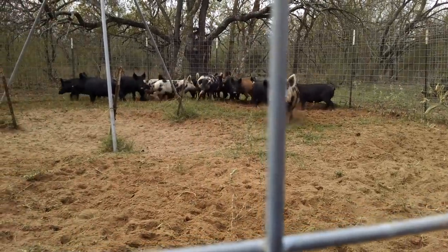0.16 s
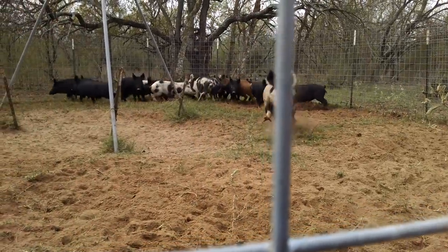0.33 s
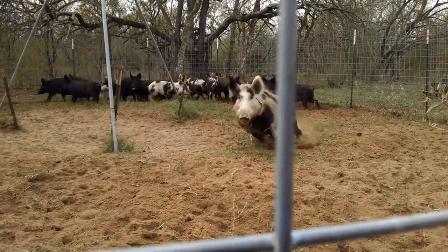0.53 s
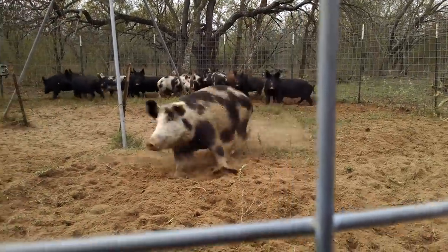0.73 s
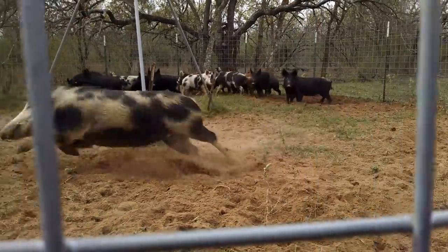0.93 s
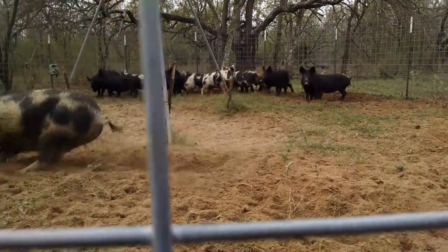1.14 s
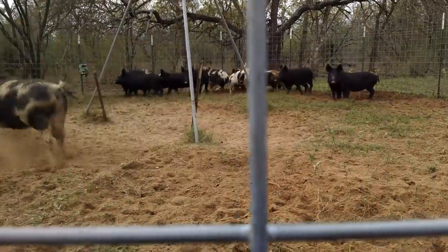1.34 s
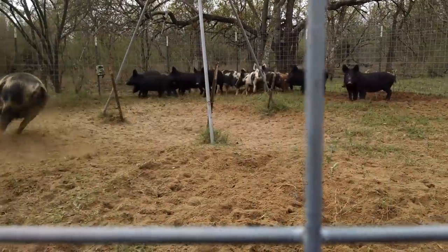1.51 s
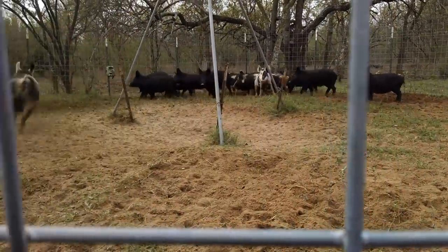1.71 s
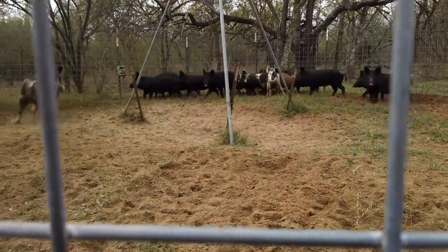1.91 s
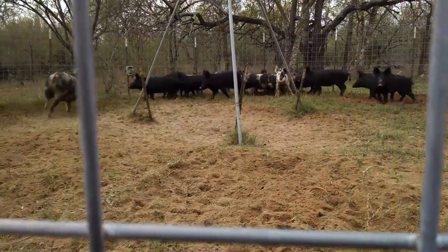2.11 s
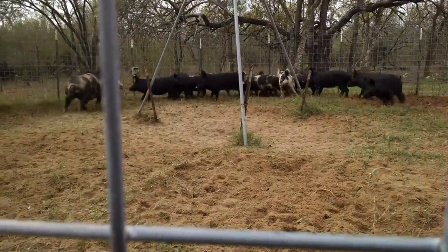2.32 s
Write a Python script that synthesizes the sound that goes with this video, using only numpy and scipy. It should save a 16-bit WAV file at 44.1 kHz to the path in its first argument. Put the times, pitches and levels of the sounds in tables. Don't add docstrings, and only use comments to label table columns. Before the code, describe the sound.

Rough hog grunts burst out close by, ending in a hard ringing bark and light hoof knocks

```python
import sys
import numpy as np
from scipy import signal
from scipy.fft import rfft, irfft, next_fast_len
from scipy.io import wavfile
from scipy.ndimage import uniform_filter1d

SR = 44100
rng = np.random.default_rng(int(sys.argv[2]) if len(sys.argv) > 2 else 0)


def generate_wav(signal):
    frames = np.transpose(np.atleast_2d(signal))
    scaled = np.clip(frames, -1, 1) * 32767
    pcm = np.round(scaled).astype(np.int16)
    wavfile.write(sys.argv[1], SR, pcm)


def convert_level_to_amplitude(level_db):
    exponent = np.asarray(level_db, float) / 20
    return 10 ** exponent


N = 103635
T = np.arange(N) / SR


def curve(rows, col=1, **ends):
    rows = np.array(rows, float)
    return np.interp(T, rows[:, 0], rows[:, col], **ends)


def unit(x):
    return x / np.sqrt(np.mean(x ** 2) + 1e-30)


LAG_S, KNEE_HZ, KNEE_WIDTH_HZ = .0004, 1440, 120
STAIR = .42


def colour(x, points, turn=0):
    size = next_fast_len(N + 4096)
    f = np.arange(size // 2 + 1) * SR / size + 1e-3
    hz, db = np.array(points, float).T
    gain = convert_level_to_amplitude(np.interp(np.log(f), np.log(hz), db))
    hz_above_knee = KNEE_WIDTH_HZ * np.logaddexp(0, (f - KNEE_HZ) / KNEE_WIDTH_HZ)
    phase = 2 * np.pi * turn * LAG_S * hz_above_knee
    phase = phase - STAIR * np.sin(2 * phase)
    return irfft(rfft(x, size) * gain * np.exp(-1j * phase), size)[..., :N]


def ring(x, hz, width_hz):
    return signal.lfilter(*signal.iirpeak(hz, hz / width_hz, fs=SR), x)


def tract(x, peaks):
    return sum((-1) ** k * convert_level_to_amplitude(db) * ring(x, hz, width) for k, (hz, width, db) in enumerate(peaks))


def walk(rate_hz):
    hold = int(SR / rate_hz)
    steps = np.repeat(rng.standard_normal(N // hold + 1), hold)
    return 1.3 * uniform_filter1d(uniform_filter1d(steps, hold), hold)[:N]


# pitch_hz [Hz], level_db [dB per Hz]
AIR_COLOUR = [(25, -5), (90, 0), (300, -9.5), (700, -13), (2000, -20), (3400, -18.5), (6000, -23),
              (15500, -71)]
AIR_DB, THUD_DB = -52.5, 4.5


def air():
    noise = unit(colour(rng.standard_normal(N), AIR_COLOUR))
    bass = signal.sosfilt(signal.butter(2, 350, fs=SR, output="sos"), noise)
    return convert_level_to_amplitude(AIR_DB) * (bass * convert_level_to_amplitude(THUD_DB * walk(25.18)) + (noise - bass) * convert_level_to_amplitude(0.93 * walk(11.76)))


# start_s [s], level_db [dB]
SHUFFLE_LEVEL = [(0, -59.5), (.4, -58.5), (.92, -61), (1.1, -58.5), (1.3, -58), (1.5, -49.5), (1.9, -53.5),
                 (2.35, -60)]
# pitch_hz [Hz], level_db [dB per Hz]
LEAF_COLOUR = [(2500, -33), (4000, -8), (7000, 1), (10500, 5), (15500, -4.5)]


def shuffle():
    grain = convert_level_to_amplitude(walk(60.7) + 1.8 * walk(900))
    rustle = unit(colour(rng.standard_normal(N) * grain, [(1200, -55), *LEAF_COLOUR]))
    return rustle * convert_level_to_amplitude(curve(SHUFFLE_LEVEL) + 1)


# start_s [s], length_s [s], level_db [dB], pitch_hz (centre) [Hz]
FOOT_SCUFFS = [(0.08, 0.3, -51.5, 68.4), (0.239, 0.023, -37.5, 60), (0.617, 0.043, -32, 91),
               (0.804, 0.087, -31, 306), (0.832, 0.072, -30, 88), (1.144, 0.094, -44.5, 700),
               (1.238, 0.068, -49, 950), (1.817, 0.091, -52, 437), (2.205, 0.19, -56, 1320),
               (2.23, 0.12, -48, 80)]


def scuffs():
    out = 0
    for start_s, length_s, level_db, pitch_hz in FOOT_SCUFFS:
        u = np.clip((T - start_s) / length_s, 0, 1)
        rasp = unit(ring(rng.standard_normal(N), pitch_hz, 1.2 * pitch_hz)) * convert_level_to_amplitude(2.5 * walk(90))
        out = out + convert_level_to_amplitude(level_db) * np.sin(np.pi * u ** 0.74) * rasp
    return out


# start_s [s], level_db [dB]
SPRAY_LEVEL = [(.08, -92), (.136, -47), (.31, -33.5), (.338, -47.5), (.44, -33), (.475, -65), (.497, -33.5),
               (.53, -28.5), (.63, -32.5), (.668, -54), (.756, -39.5), (.802, -60), (.824, -38), (.89, -45),
               (.932, -28.5), (.985, -71), (1.138, -65), (1.192, -40.5), (1.34, -72)]
# pitch_hz [Hz], level_db [dB per Hz]
SAND_COLOUR = [(2500, 8.5), (3500, -6), (4700, 1), (6500, -7.5), (9300, -2), (12500, -14), (15500, -6)]
# start_s [s], level_db [dB]
SKID_LEVEL = [(.87, -41), (.885, -35), (.91, -33.5), (.95, -34.5), (.985, -66.5)]


def spray():
    grain = convert_level_to_amplitude(1.3 * walk(25) + 1.4 * walk(70) + 2.4 * walk(900))
    hiss = unit(colour(rng.standard_normal(N) * grain, [(1200, -80), *SAND_COLOUR]))
    rasp = unit(ring(rng.standard_normal(N) * convert_level_to_amplitude(2.8 * walk(300)), 1420, 2100))
    skidding = (T > SKID_LEVEL[0][0]) * (T < SKID_LEVEL[-1][0])
    return hiss * convert_level_to_amplitude(curve(SPRAY_LEVEL, left=-99, right=-99)) + rasp * convert_level_to_amplitude(curve(SKID_LEVEL)) * skidding


# start_s [s], level_db (peak) [dB], pitch_hz [Hz], tick_db [dB]
HOOF_KNOCKS = [(.112, -46, 300, -39), (.912, -34, 1400, -30), (1.1265, -31, 230, -40),
               (1.151, -44, 500, -42), (1.171, -36, 450, -40), (1.178, -37, 500, -42),
               (1.192, -38, 300, -48), (1.327, -41, 200, -60), (1.387, -38, 600, -33),
               (1.3925, -40, 500, -34), (2.002, -42, 300, -56), (2.0985, -33, 800, -36),
               (2.206, -37, 280, -37)]
TICK_HZ, TICK_TAIL_S = 2000, .0018


def hooves():
    out, t = np.zeros(N), np.arange(2000) / SR
    for start_s, level_db, pitch_hz, tick_db in HOOF_KNOCKS:
        knock = np.sin(2 * np.pi * pitch_hz * t) * np.exp(-t * pitch_hz * .8)
        tick = ring(rng.standard_normal(2000) * np.exp(-t / TICK_TAIL_S), TICK_HZ, TICK_HZ)
        i = int(start_s * SR)
        out[i:i + 2000] += 1.3 * convert_level_to_amplitude(level_db) * knock + convert_level_to_amplitude(tick_db) * tick / np.abs(tick).max()
    return out


JITTER, SCATTER_DB = .09, 2.5
WEAK_DB = 1.5
PUFF = 1


def folds(start_s, end_s, rate_hz, rough, sag):
    timing, strength = rng.standard_normal((2, 80))
    at = np.cumsum(np.exp(JITTER * timing)) / rate_hz
    at = start_s - .03 + at * (1 + sag * at / (end_s - start_s) / 2)
    level_db = SCATTER_DB * strength - WEAK_DB * (np.arange(80) % 2)
    keep = at < min(end_s + .03, N / SR - 1e-3)
    pulses = np.zeros(N)
    pulses[(at[keep] * SR).astype(int)] = convert_level_to_amplitude(level_db[keep])
    puff = signal.lfilter([1], [1, -np.exp(-rate_hz / PUFF / SR)], pulses) * rng.standard_normal(N)
    return np.sqrt(1 - rough) * unit(pulses) - np.sqrt(rough) * unit(puff)


def glide(x, hz, width_hz):
    bent = np.cumsum(hz / hz.min())
    even = ring(np.interp(np.arange(int(bent[-1]) + 1), bent, x), hz.min(), width_hz)
    return np.interp(bent, np.arange(len(even)), even)


# start_s [s], first_hz [Hz], second_hz [Hz]
MOUTH_SHAPE = [(.17, 1094, 1660), (.25, 1062, 1760), (.31, 1010, 1650), (.38, 994, 1710), (.41, 937, 1645),
               (.44, 1047, 1725), (.5, 1085, 1805), (.52, 1026, 1780), (.55, 937, 1700), (.59, 1032, 1630),
               (.64, 1040, 1670), (.7, 1030, 1640), (.76, 995, 1670), (.82, 1052, 1640), (.838, 1080, 1650),
               (.847, 1013, 1650), (.88, 998, 1653)]


def snout(x, peaks, wander):
    out = tract(x, peaks[2:])
    for k, (_, width_hz, level_db) in enumerate(peaks[:2]):
        hz = curve(MOUTH_SHAPE, col=k + 1) * (1 + wander)
        out = out + (-1) ** k * convert_level_to_amplitude(level_db) * glide(x, hz, width_hz)
    return out


# start_s [s], level_db [dB], mouth_db (opening) [dB]
BREATH_LEVELS = [
    [(.165, -72, 1), (.183, -38.5, 6.5), (.2, -38.5, 4.5), (.221, -44, -7), (.228, -23, -25)],
    [(.228, -39, -54), (.246, -25.5, 3.5), (.27, -28, -6), (.308, -18, -8), (.34, -53, -3)],
    [(.34, -44.5, -2.5), (.392, -26.5, -6.5), (.438, -24, -4), (.47, -36, 1), (.485, -36.5, -10)],
    [(.485, -30, -9), (.499, -20.5, -5), (.53, -16.5, -8.5), (.637, -23.5, -10.5), (.67, -53.5, -6)],
    [(.67, -44, -10), (.685, -47, 8.5), (.742, -31.5, -1), (.778, -39.5, -1), (.8, -62, 8)],
    [(2.165, -52, -17), (2.178, -50, -8), (2.235, -43, -10), (2.27, -50.5, -6.5), (2.35, -44, -9)],
]
# rate_hz [Hz], rough [0-1], sag (rate share) [1], chest_db [dB]
FOLD_SETTINGS = [(87.3, 0.82, 0.039, 2.5), (250.3, 0.2, .3, -10), (163, 0.34, 0.004, -7),
                 (267.4, 0.43, .2, -56), (143.3, 0.7, 0, -2.5), (92.8, 0, 0.03, -2.5)]
# pitch_hz [Hz], width_hz [Hz], level_db [dB]
THROAT_PEAKS = [(275, 60, -3), (395, 50, 0), (525, 80, -7)]
# pitch_hz [Hz], width_hz [Hz], level_db [dB]
SNOUT_PEAKS = [(1009, 90.5, 2), (1730, 124, -6.5), (1852, 74, -13), (2340, 180, -14.5), (2980, 108, -11)]
# pitch_hz [Hz], width_hz [Hz], depth (share) [1]
NASAL_VALLEYS = [(780, 49, 0.15), (1389, 950, 0.88)]
CHEST_HZ, CHEST_WIDTH_HZ, GRUNT_DB = 151, 333, 2


def hog():
    out, breath = whine(), np.zeros(N)
    for rows, (rate_hz, rough, sag, chest_db) in zip(BREATH_LEVELS, FOLD_SETTINGS):
        start_s, end_s = rows[0][0], rows[-1][0]
        source = folds(start_s, end_s, rate_hz, rough, sag)
        chest = ring(ring(source, CHEST_HZ, CHEST_WIDTH_HZ), CHEST_HZ, CHEST_WIDTH_HZ)
        low = tract(source, THROAT_PEAKS) + convert_level_to_amplitude(chest_db) * chest
        inside = (T >= start_s) & (T <= end_s)
        gate = uniform_filter1d(inside * 1., 200)
        gain = convert_level_to_amplitude(curve(rows) + GRUNT_DB) * gate / np.std(low[inside])
        out += gain * low
        breath += source * gain * convert_level_to_amplitude(curve(rows, col=2))
    out += snout(breath, SNOUT_PEAKS, .02 * walk(40))
    for pitch_hz, width_hz, depth in NASAL_VALLEYS:
        out = out - depth * ring(out, pitch_hz, width_hz)
    return out


# start_s [s], throat_db [dB], snout_db [dB]
FOLD_SLAPS = [(.183, -28, -37), (0.2338, -14, -30), (0.2418, -13, -46), (0.2488, -6.5, -9.5),
              (0.2647, -7.5, -41), (0.3124, -12.5, -21), (0.381, -23, -27), (0.4013, -32, -22),
              (0.417, -20, -24), (0.4363, -19, -15), (0.444, -29, -21.5), (0.5, -17, -15),
              (0.5005, -35, -12.5), (0.511, -27, -14.5), (0.590, -10, -16.5), (.600, -20, -16),
              (0.81, -22.5, -24), (0.8236, -11, -11), (0.842, -10.5, -10.5), (0.8611, -12.5, -16),
              (.875, -23, -19)]
# pitch_hz [Hz], width_hz [Hz], level_db [dB]
SLAP_THROAT_PEAKS = [(131.7, 64, 0.5), (259, 98, 7), (653, 120, 0.5)]
# pitch_hz [Hz], width_hz [Hz], level_db [dB]
SLAP_SNOUT_PEAKS = [(1070, 62, 0), (1660, 80, -8), (1940, 110, -13)]
PUSH_S = .0003


def slaps():
    start_s, throat_db, snout_db = np.array(FOLD_SLAPS).T
    push = np.hanning(int(PUSH_S * SR) + 2)

    def hits(level_db, peaks):
        hit = np.zeros(N)
        loudest = np.abs(tract((T == 0) * 1., peaks)).max()
        hit[(start_s * SR).astype(int)] = -convert_level_to_amplitude(level_db) / loudest
        return np.convolve(hit, push / push.sum())[:N]

    throat = tract(hits(throat_db, SLAP_THROAT_PEAKS), SLAP_THROAT_PEAKS)
    return throat + snout(hits(snout_db, SLAP_SNOUT_PEAKS), SLAP_SNOUT_PEAKS, 0)


# start_s [s], pitch_hz [Hz], width_hz [Hz], level_db (peak) [dB]
MOUTH_RINGS = [(0.235, 3100, 110, -35), (.241, 3120, 120, -32), (0.2493, 2980, 130, -19.5),
               (0.2495, 3310, 150, -23), (.2495, 9300, 160, -23), (.2495, 4100, 300, -32),
               (0.2632, 3050, 130, -27), (.266, 8500, 200, -34), (0.8105, 3270, 120, -31),
               (.817, 3200, 120, -35), (0.8243, 3250, 150, -11.5), (.8242, 3870, 124, -16.5),
               (0.8242, 4530, 140, -21), (.826, 1099, 13, -15), (0.831, 3760, 150, -29),
               (.832, 3330, 77, -27), (0.8434, 3192, 77, -11), (.844, 4770, 170, -24),
               (0.8454, 3870, 170, -25), (0.8454, 2340, 120, -20), (.854, 3260, 110, -32),
               (0.86, 3050, 53, -31), (.8625, 1044, 42, -6.5), (.862, 1630, 56, -15.5)]
SWELL_S = .0009


def rings():
    out = 0
    for start_s, pitch_hz, width_hz, level_db in MOUTH_RINGS:
        u = np.clip(T - start_s, 0, None)
        envelope = (1 - np.exp(-u / SWELL_S)) * np.exp(-np.pi * width_hz * u)
        out = out + convert_level_to_amplitude(level_db) * envelope * np.sin(2 * np.pi * pitch_hz * u)
    return out


# start_s [s], pitch_hz [Hz], level_db [dB]
WHINE_TONE = [(.49, 271.8, -40), (.504, 270.3, -8), (.514, 289, -26), (.524, 382, -9.5), (.536, 406, -10),
              (.542, 370.5, -31), (.562, 305, -15.5), (.576, 270, -21), (.59, 268, -40)]


def whine():
    phase = 2 * np.pi * np.cumsum(curve(WHINE_TONE) * (1 + 0.019 * walk(119.1))) / SR
    level = np.sqrt(2) * convert_level_to_amplitude(curve(WHINE_TONE, col=2, left=-99, right=-99))
    return level * (np.sin(phase) + convert_level_to_amplitude(-25) * np.sin(2 * phase))


# start_s [s], length_s [s], start_hz [Hz], end_hz [Hz], level_db [dB]
BIRD_PEEPS = [
    (0.985, .125, 6600, 6680, -60.5),
    (2.135, .035, 6550, 7900, -57),
]


def bird():
    out = 0
    for start_s, length_s, start_hz, end_hz, level_db in BIRD_PEEPS:
        u = np.clip((T - start_s) / length_s, 0, 1)
        hz = start_hz + (end_hz - start_hz) * u ** 0.56 + 22 * walk(80)
        level = convert_level_to_amplitude(level_db + 2 * walk(50)) * np.sin(np.pi * u) ** .5
        out = out + level * np.sin(2 * np.pi * np.cumsum(hz) / SR)
    return out


# pitch_hz [Hz], level_db [dB]
PORT_COLOUR = [(100, 0), (4000, 0), (5300, -1), (5700, -3), (6900, -6), (8600, -9), (15000, -10)]
# pitch_hz [Hz], level_db [dB]
HOG_SHADE = [(110, -1), (330, -5), (1000, -1), (1600, 3.5), (2650, -.5), (3300, -9), (4700, -4), (9000, -1)]
# pitch_hz [Hz], level_db [dB]
LOOSE_COLOUR = [(30, -1), (100, -6), (500, -2), (1000, -9), (2050, -3), (2700, -13), (5200, -8), (15000, 0)]
ECHO_S, ECHO_DB, ECHO_HZ, ECHO_WIDTH_HZ = 0.0084, -12, 1260, 2600
BESIDE_S, BESIDE_DB = .66, -11


def scene():
    near = hog() + slaps() + spray()
    bark = rings() + convert_level_to_amplitude(BESIDE_DB) * near * (T > BESIDE_S)
    far = hooves() + scuffs() + bird() + air() + shuffle()
    decay = np.exp(-np.arange(8000) / SR / ECHO_S) / np.sqrt(ECHO_S * SR / 2)
    tail = rng.standard_normal((2, 8000)) * decay
    echo = convert_level_to_amplitude(ECHO_DB) * signal.fftconvolve(ring(near, ECHO_HZ, ECHO_WIDTH_HZ)[None], tail)[:, :N]
    loose = colour(np.array([air() + shuffle() + spray() + scuffs() for _ in range(2)]), LOOSE_COLOUR)
    left = colour(near, HOG_SHADE) + colour(bark, PORT_COLOUR, turn=-1.07) + far
    return np.array([left, near + bark + far]) + loose + echo


JOIN_DB, JOIN_HZ = -11, 900


def join(x):
    mid_side = np.array([x[0] + x[1], x[0] - x[1]]) / 2
    f, _, z = signal.stft(mid_side, SR, nperseg=2048)
    band = np.arange(len(f)) // 8
    power = np.add.reduceat(abs(z) ** 2, np.arange(0, len(f), 8), axis=1)[:, band]
    keep = (power > convert_level_to_amplitude(2 * JOIN_DB) * power[::-1]) | (f < JOIN_HZ)[:, None]
    mid, side = signal.istft(z * keep, SR, nperseg=2048)[1][:, :N]
    return np.array([mid + side, mid - side])


def band_limit(x):
    return signal.sosfilt(signal.butter(12, 16000, fs=SR, output="sos"), x)


CEILING, TOP_HZ = 1.1, 15750


def record(dry):
    ports = np.array([colour(dry[0], PORT_COLOUR, turn=0.98), dry[1]])
    rounded = np.tanh(ports / CEILING) * CEILING
    mix = signal.sosfilt(signal.ellip(10, .2, 80, TOP_HZ, fs=SR, output="sos"), rounded)
    mix = join(mix)
    return band_limit(mix)


dry = scene()
out = record(dry)
generate_wav(out)
```